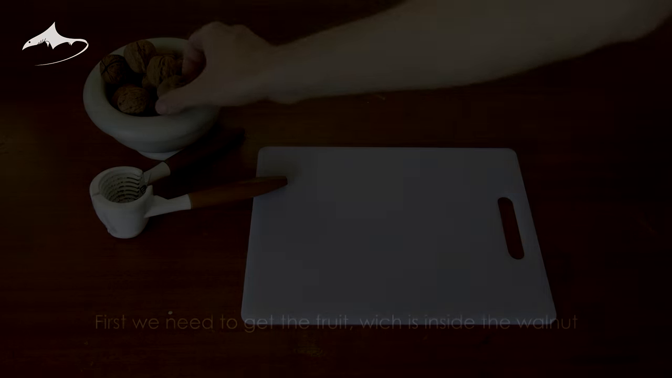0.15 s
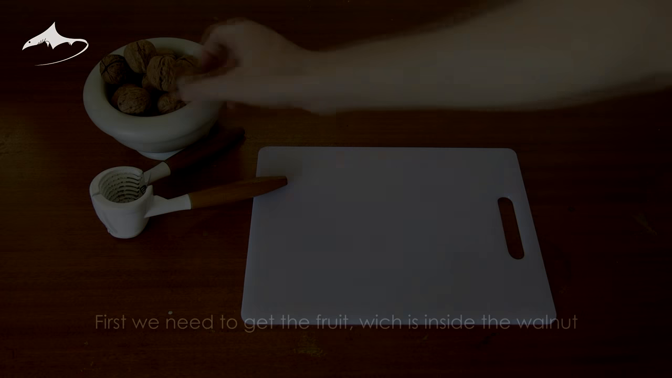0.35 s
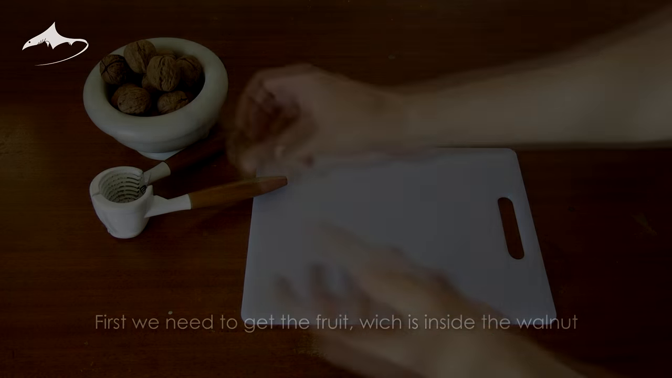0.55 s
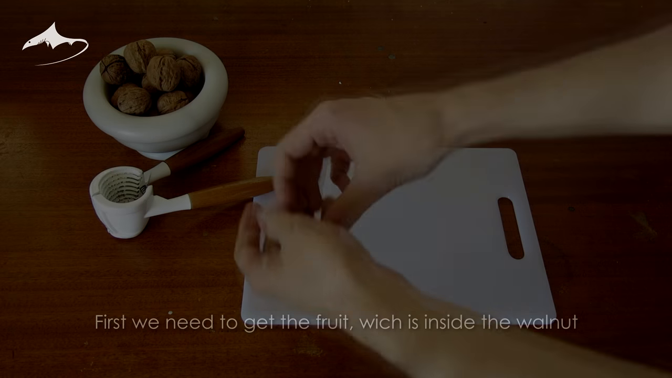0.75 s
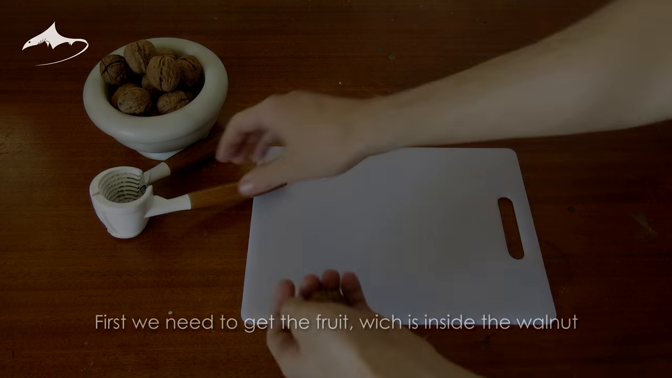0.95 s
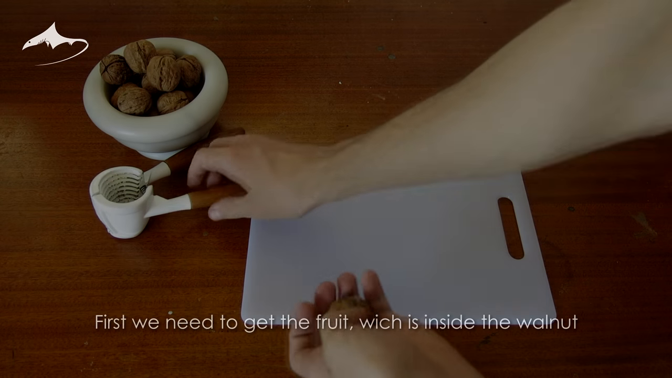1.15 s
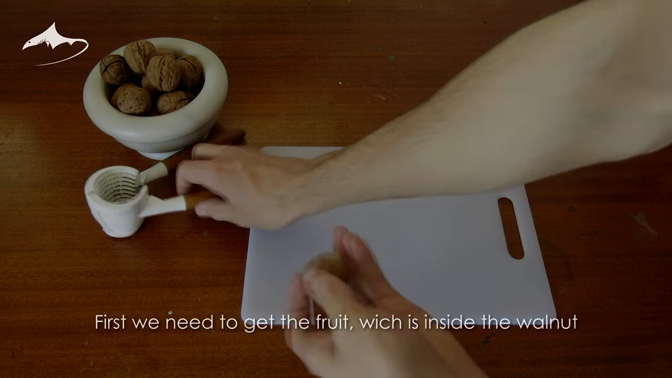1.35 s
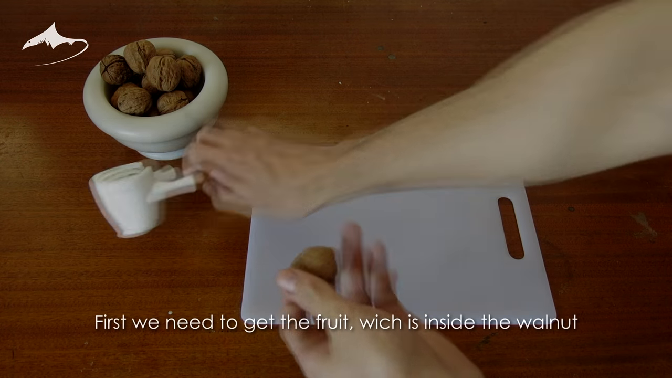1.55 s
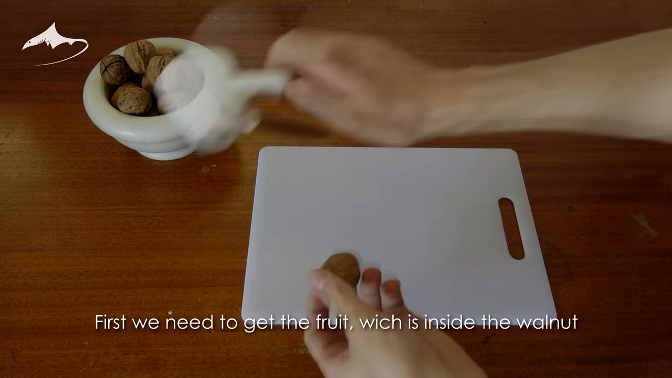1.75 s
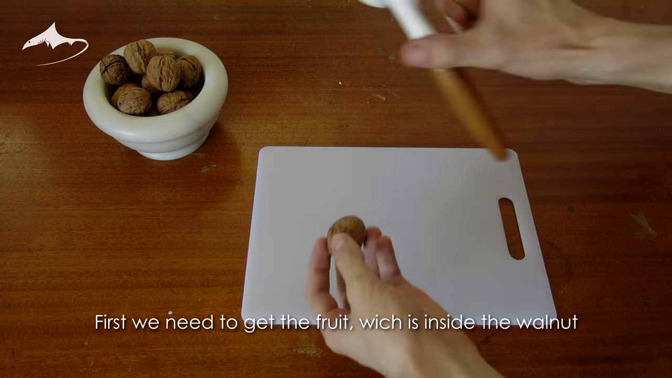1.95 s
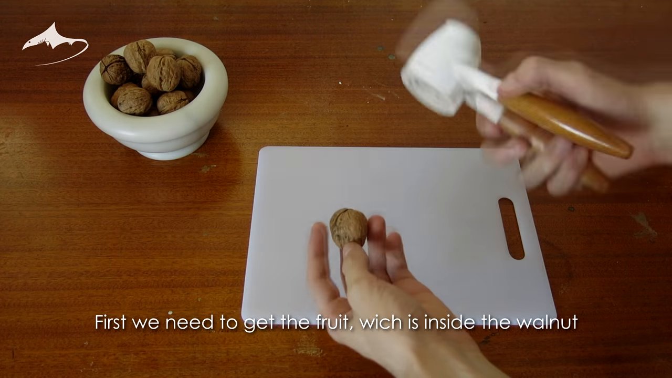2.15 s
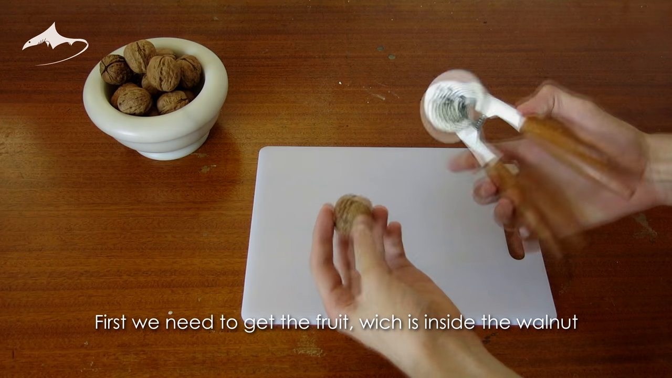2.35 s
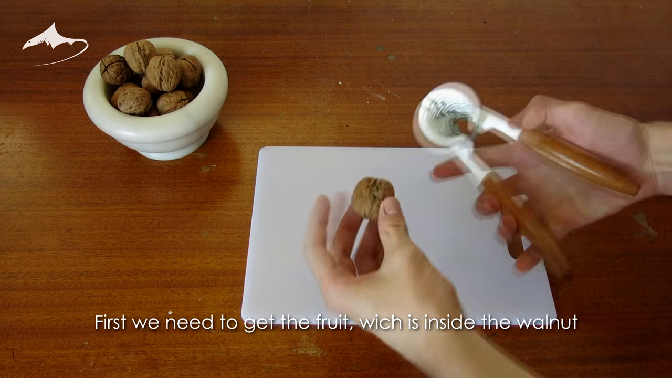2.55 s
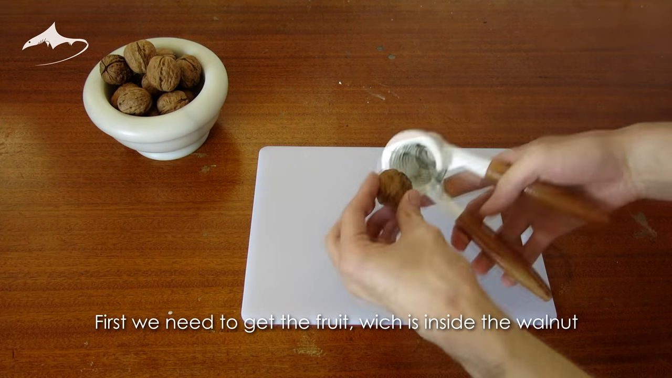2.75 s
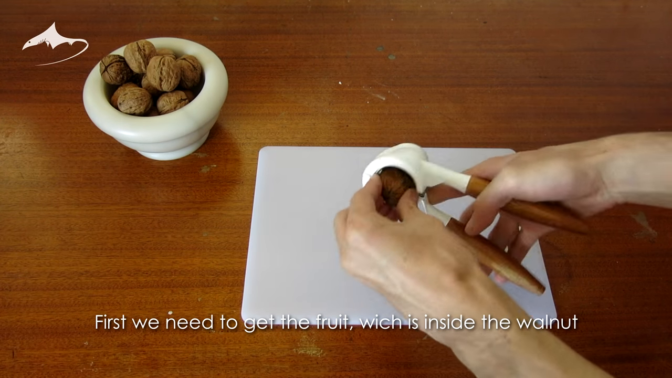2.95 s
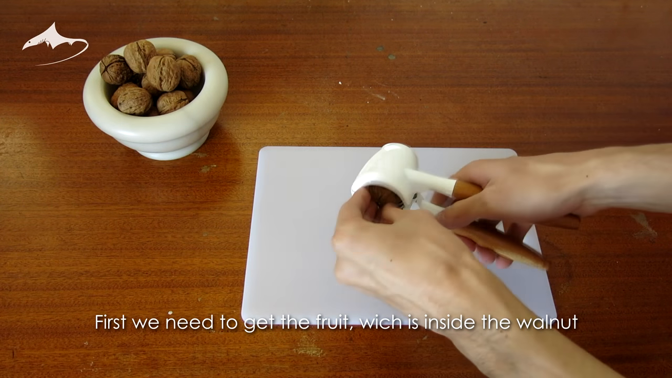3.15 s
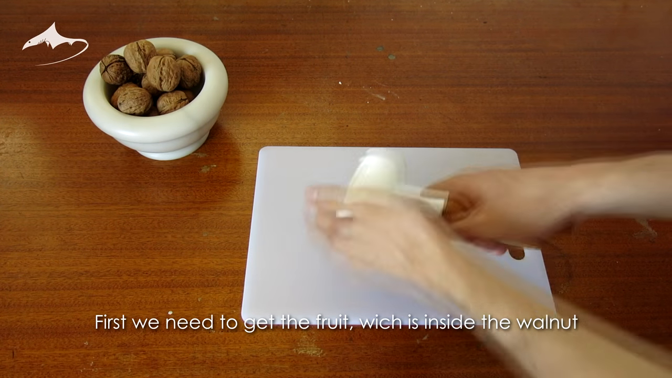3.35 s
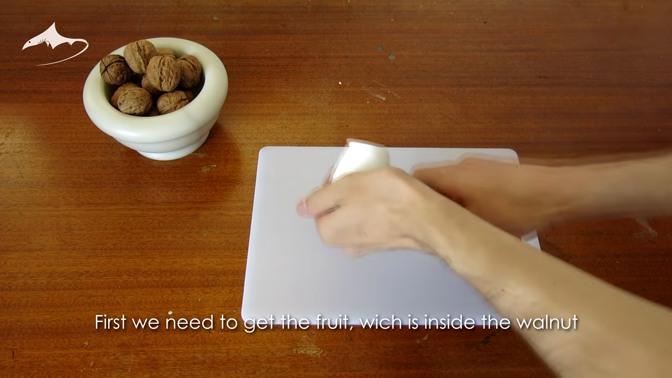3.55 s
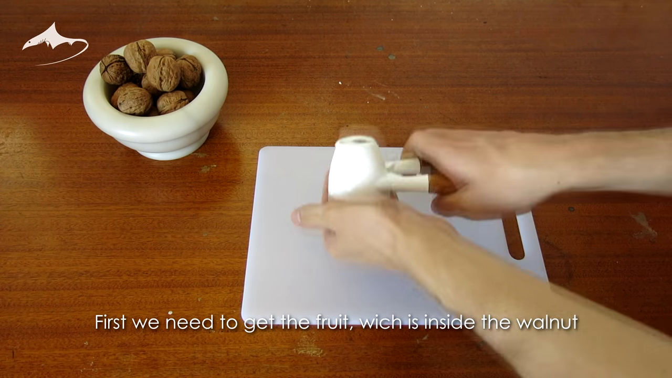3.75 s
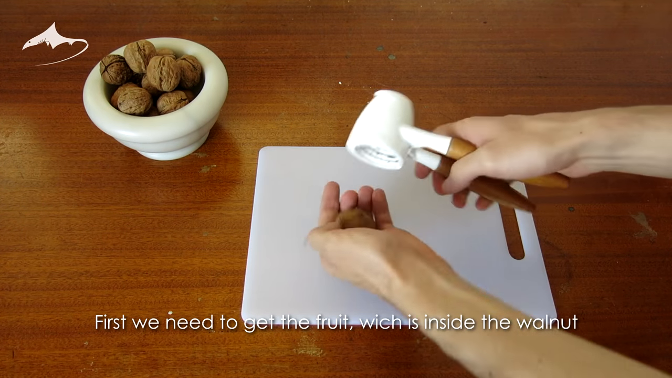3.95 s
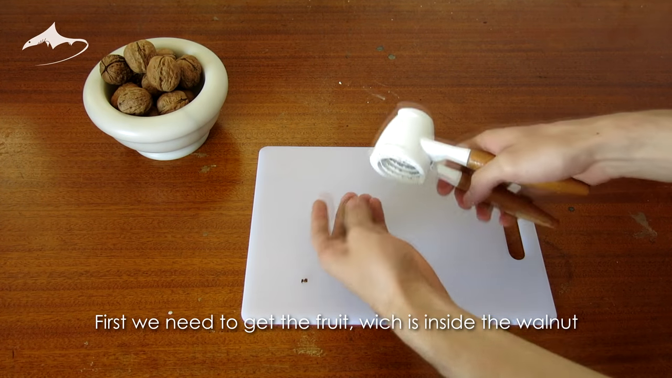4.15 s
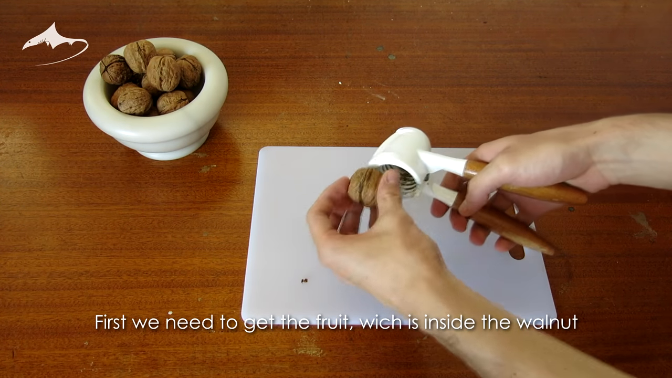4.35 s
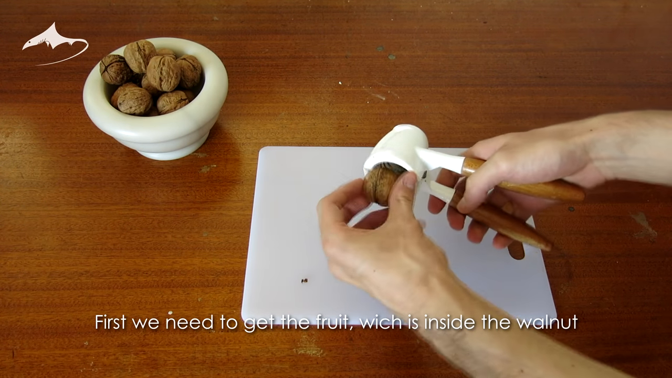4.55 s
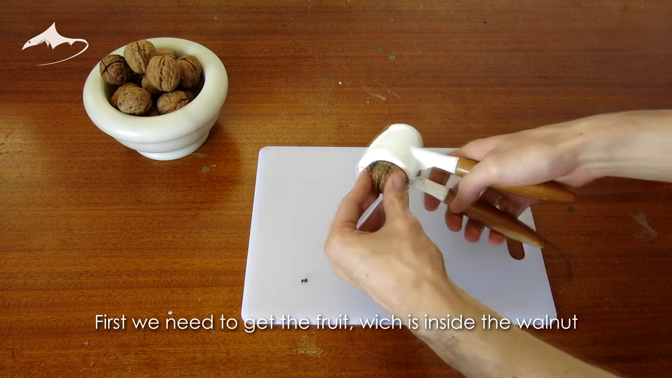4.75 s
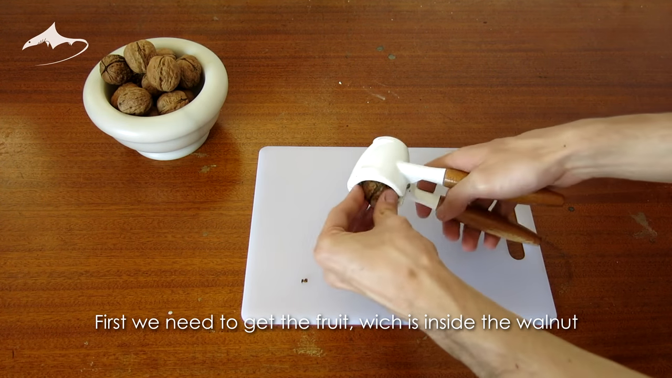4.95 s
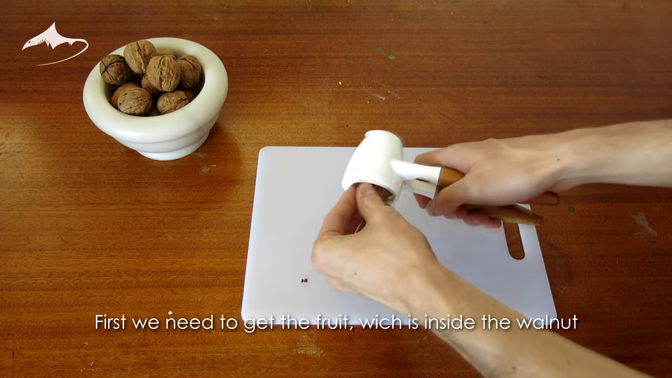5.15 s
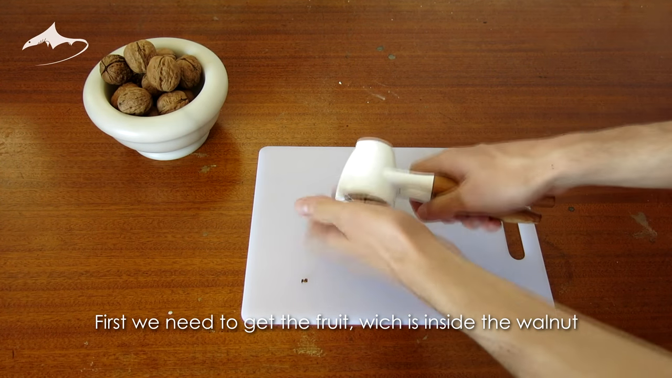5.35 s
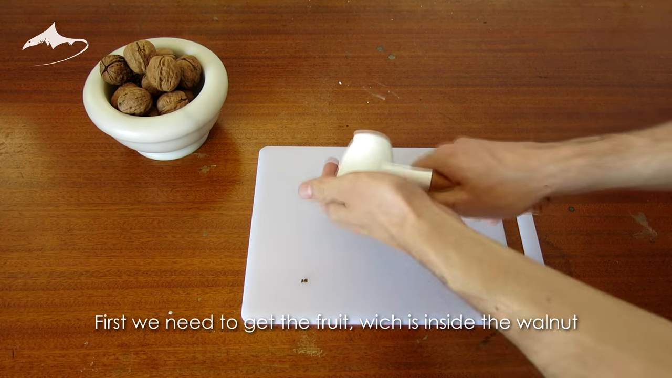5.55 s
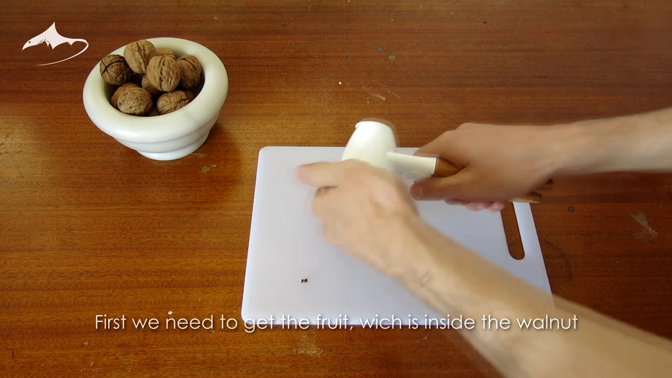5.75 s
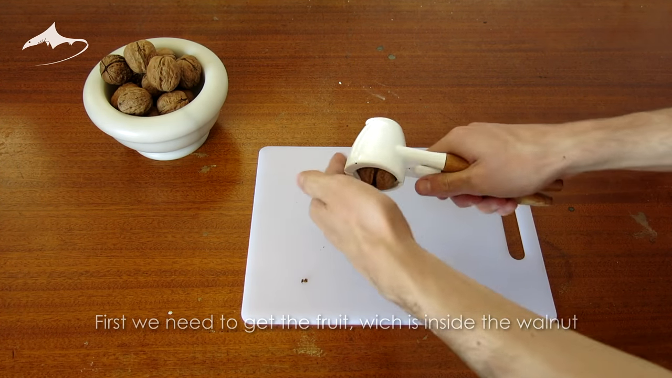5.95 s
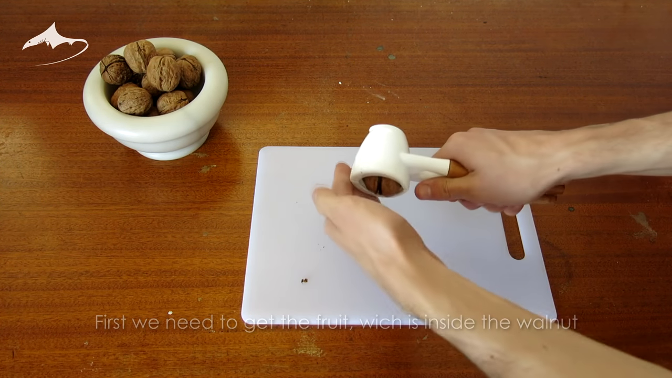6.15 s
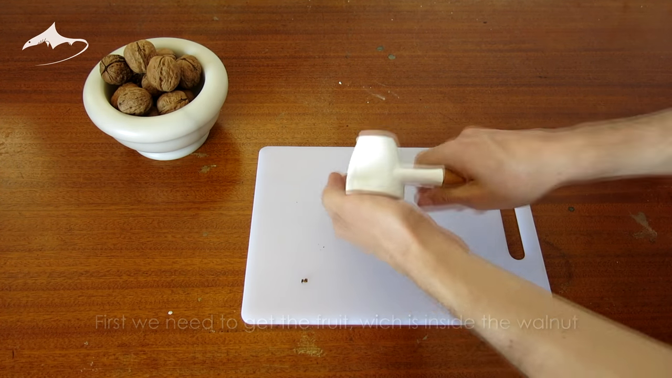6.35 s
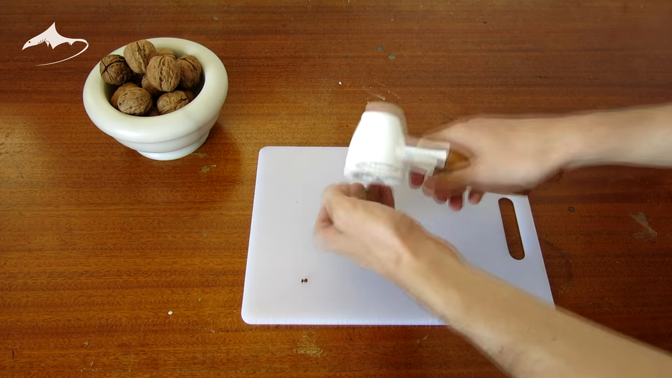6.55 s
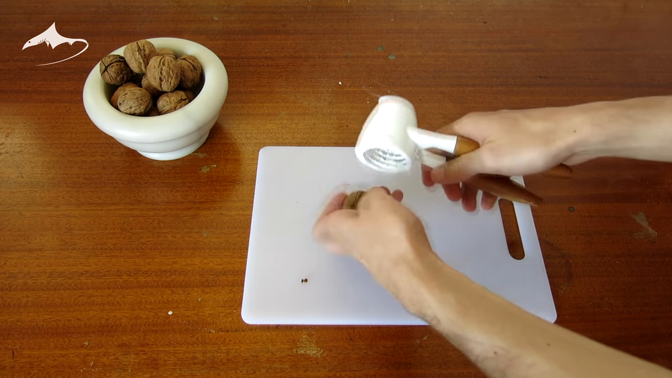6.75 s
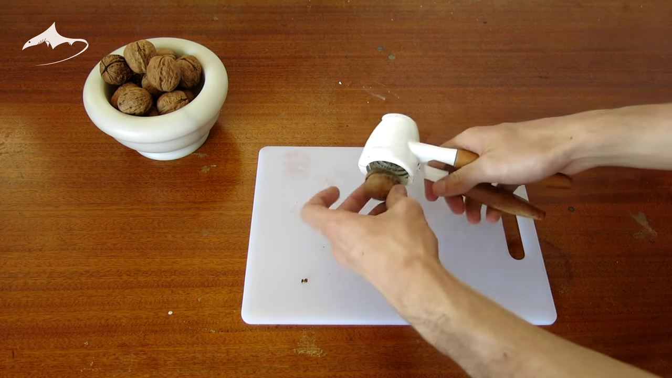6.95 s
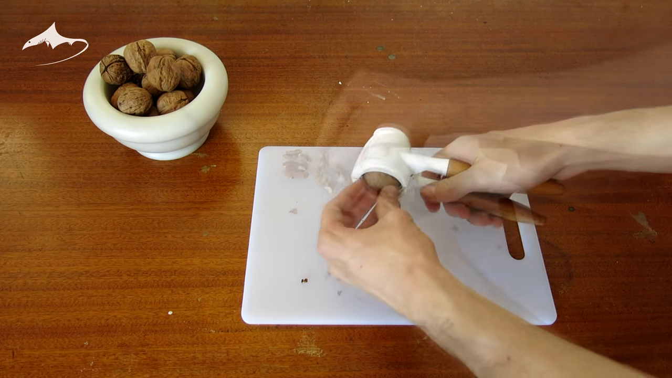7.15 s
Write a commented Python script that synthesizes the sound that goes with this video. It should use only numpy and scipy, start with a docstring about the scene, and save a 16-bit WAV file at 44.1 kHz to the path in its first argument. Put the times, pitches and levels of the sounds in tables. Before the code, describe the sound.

Quiet room noise, wooden thumps and metal clinks of a hand tool, dry walnut knocks and rubs, then loud crunching shell cracks, two clusters and a late snap.

```python
"""In a small room, at a wooden table with a cutting board, walnuts are cracked in a metal cup nutcracker.
The tool bumps and clinks as it is picked up: table and metal are sums of dying sine waves.
Nuts knock and rub in the cup, then break in short runs: noise bursts and clicks ring a hollow shell filter.
Steady room noise, hiss and rustle are shaped noise; each contact gets a board reflection and a room tail.
A gain control turns the sound down after the loudest cracks and lets the room noise creep back."""
import sys
import numpy as np
from scipy import signal
from scipy.fft import rfft, irfft
from scipy.io import wavfile
from scipy.ndimage import uniform_filter1d

SR = 44100
rng = np.random.default_rng(int(sys.argv[2]) if len(sys.argv) > 2 else 0)


def transcribe(signal):
    """Save signal, clipped to [-1, 1], as a 16-bit WAV file at the path in sys.argv[1]."""
    frames = np.atleast_2d(signal).T
    limited = np.clip(frames, -1, 1)
    pcm = np.round(limited * 32767).astype(np.int16)
    wavfile.write(sys.argv[1], SR, pcm)


N = 321930

# steady room noise: (frequency [Hz], relative level per Hz [dB])
AIR_COLOUR = [(25, -37.5), (50, -15.5), (80, -4), (108, 1), (190, -5.5), (255, -9), (305, -4), (355, -9.5),
              (480, -13), (750, -13.5), (1400, -18.5), (2600, -26), (5000, -33), (9000, -42.5),
              (16000, -50.5)]
# stereo width of that noise: (frequency [Hz], side minus mid [dB], left minus right [dB])
AIR_WIDTH = [(60, -4.5, 12), (107.7, -3, 12), (200, -6.5, -1.5), (380, -6, -5), (700, -0.5, -3.5),
             (2400, -1.5, -1)]
# the arms reach across: (middle [s], time from the middle to 1/e [s], high hiss [dB], low rustle [dB])
ARM_REACHES = [(0.73, 0.27, -60, -52.5), (3.098, 1, -62.5, -43.5)]
# colour of the low rustle: (frequency [Hz], relative level per Hz [dB])
RUSTLE_COLOUR = [(30, -30), (80, -6), (160, -1), (300, -6), (600, -12.5), (2000, -37.5), (16000, -74)]
# the cracker bumps the table: (time [s], level [dB], upper corner of the blow [Hz])
TABLE_BUMPS = [(1.406, -22.5, 1800), (1.4511, -21.5, 2010), (1.495, -24, 453), (1.5106, -25, 3020),
               (1.6604, -19, 950), (7.194, -29.5, 1350)]
# ringing modes of the table top: (frequency [Hz], strength [dB], time to fall 60 dB [s])
TABLE_MODES = [(187, -3, 0.02), (356.4, -0.5, 0.086), (423.4, 0, 0.21), (510, 0, 0.037), (648, -4.5, 0.088),
               (717, -2, 0.12), (956, -5.5, 0.15), (1180, 0, 0.015), (1410, -1.5, 0.042), (1605, 0, 0.039),
               (1850, -4, 0.08), (2370, -25, .03)]
# jaws and hinge clink: (time [s], level [dB], centre of the modes that the blow favours [Hz])
JAW_CLINKS = [(1.4085, -26, 4000), (1.4514, -29.5, 3740), (1.511, -17.5, 6900), (1.6611, -32, 5270),
              (2.0284, -20, 2630), (2.0307, -24, 8000), (2.1417, -30, 2370), (2.3884, -36, 2820),
              (2.7026, -33, 5040), (2.7805, -21.5, 2700)]
# modes of the cracker ringing freely: (frequency [Hz], strength [dB], time to fall 60 dB [s])
METAL_MODES = [(2200, 7.5, 0.038), (2417, 5, 0.1), (3010, 9.5, 0.044), (3160, 4.5, 0.021),
               (4110, 1.5, 0.19), (4018, 10.5, 0.053), (4654, 2.5, 0.089), (5300, -24, 0.022),
               (6290, 2.5, 0.022), (7190, 5, 0.033), (7510, 5, 0.074), (8520, -8, 0.049), (9080, -3, 0.046),
               (11300, -19, .02)]
# a nut rubs round in the cup: (start [s], end [s], level [dB], shell ring [Hz], scratch against ring [dB])
CUP_RUBS = [(2.799, 2.993, -40, 1180, 2), (3.722, 3.86, -58, 1830, 2.5), (4.731, 4.951, -49, 2130, -4),
            (4.962, 5.159, -51, 2060, 2.5), (5.594, 5.64, -34.5, 1446, 5.5),
            (6.921, 7.047, -44, 1584, -2.5), (7.183, 7.321, -49, 2030, 2.5)]
# clear knocks of a nut on the cup: (time [s], shell ring level [dB], ring [Hz], contact tick level [dB])
NUT_KNOCKS = [(2.8145, -28, 2220, -21.5), (2.874, -30, 1620, -33), (2.925, -25.5, 2210, -22),
              (2.951, -30, 2350, -27), (3.0558, -37, 2250, -33), (3.075, -39, 2800, -28),
              (3.801, -28.5, 1755, -37.5), (3.932, -25, 2130, -41.5), (4.3956, -27, 2330, -34.5),
              (4.3975, -28.5, 1650, -50), (4.6003, -36.5, 2480, -42.5), (4.7351, -20.5, 2280, -28),
              (4.8698, -25.5, 2200, -35.5), (5.0294, -31, 2290, -41), (5.0639, -38, 2400, -34.5),
              (5.086, -24.5, 2230, -30), (5.116, -29, 1800, -28), (5.9101, -31, 2275, -51.5),
              (6.4253, -27, 2470, -29.5), (6.926, -31, 1570, -33.5), (6.9615, -24.5, 1750, -30.5),
              (7.237, -25.5, 2420, -18)]
# colour of dry shell touching metal: (frequency [Hz], response [dB])
TICK_COLOUR = [(150, -15), (500, -9), (1400, 1.5), (2500, 5.5), (4000, -6.5), (6000, -7), (9000, -13),
               (13000, -19.5), (16000, -23)]
# loose shell ticks on the cup after a nut has broken: (start [s], end [s], tick level [dB])
CRUMB_SPANS = [(3.62, 4.101, -39.5), (5.78, 5.86, -36.5)]
# separately timed fractures, faint to loud; longer tears shed more splinters:
# (time [s], snap level [dB], shell ring level [dB], ring [Hz], tear, time to fall to 1/e [ms])
SHELL_CRACKS = [(3.3826, -15, -33, 3300, 2.4), (3.433, -25, -40, 4560, 7.9), (3.4594, -10.5, -7, 4770, 1.6),
                (3.4836, -3, -5.5, 2830, 3.4), (3.5074, -6, -9.5, 2100, 4.7),
                (5.4653, -33.5, -42, 2330, 1.7), (5.5282, -27.5, -49, 4500, 3.3),
                (5.5359, -8.5, -12, 2000, 1.6), (5.5993, -16, -19, 2270, 0.84),
                (5.6018, -11, -10, 2470, 2.3), (5.606, -9.5, -14.5, 2030, 3),
                (5.6459, -12.5, -17.5, 3780, 1.3), (5.6562, -11.5, -23, 4640, 3.7),
                (5.6883, -19.5, -42, 2330, 3.2), (6.146, -7.5, -28.5, 3080, 0.74),
                (6.1612, -12.5, -22.5, 1950, 0.85)]
# the jaws bear down between these fractures and the shell crackles: (start [s], end [s], snap level [dB])
JAW_SQUEEZES = [(3.473, 3.504, -22), (5.61, 5.63, -31)]
# bright colour of a fracture: (frequency [Hz], response [dB])
SNAP_COLOUR = [(200, -26), (700, -23.5), (1500, -16.5), (3000, -18), (4500, -2.5), (6000, 0.5), (7400, -3),
               (9000, 1.5), (12000, -2.5), (14500, -6), (16000, -11)]
# hollow shell modes: (multiple of ring pitch, undamped width as share of mode pitch, strength [dB])
SHELL_MODES = [(0.561, .14, -12), (0.742, 0.15, -5.5), (.88, .09, -0.5), (1, 0.094, 15), (1.13, .1, -21.5),
               (1.499, .2, -14.5)]
# how the room dies away: (frequency [Hz], time to fall 60 dB [s])
ROOM_DECAY = [(300, 0.42), (1300, 0.41), (3500, 0.35), (9000, 0.29), (16000, 0.18)]

HIT_SIZE, ROOM_SIZE = 8192, 16384  # lengths of one hit and of the room tail [samples]
AGE = np.arange(HIT_SIZE) / SR  # time since a hit [s]
TIME = np.arange(N) / SR  # time in the scene [s]
SIDES = np.array([[1], [-1]])  # signs of the left and right channels
TOP_HZ = 15800  # nothing much is left above this
LIFT_S = 1.6  # the cracker leaves the table [s]
LYING_RING, HELD_RING = 0.44, 0.4  # share of the free ring time, on the table and in the hand
REST_HISS_DB, REST_RUSTLE_DB = -66.5, -52.5  # what stays between the reaches


def undb(db):
    """Turn decibels into gain."""
    return 10 ** (np.asarray(db) / 20)


def level(x, db):
    """Set the average (rms) level of a sound."""
    return x * undb(db) / np.sqrt(np.mean(x ** 2))


def sized(x, db):
    """Give a hit the energy of four milliseconds at this rms level."""
    energy = np.sum(x ** 2) / len(x)
    return x * undb(db) / np.sqrt(energy / (.004 * SR))


def along(points, hz, axis=1):
    """Read a table column between its rows, on a log-frequency scale."""
    rows = np.array(points, float)
    return np.interp(np.log(hz + 1), np.log(rows[:, 0]), rows[:, axis])


def bins(size):
    """List the frequencies of a spectrum."""
    return np.arange(size // 2 + 1) * SR / size


def colour(x, points):
    """Filter with a (frequency [Hz], response [dB]) table, without ringing ahead of the sound."""
    size = x.shape[-1]
    # folding the cepstrum forward gives the filter minimum phase
    cepstrum = irfft(np.log(undb(along(points, bins(size)))), size)
    cepstrum[1:size // 2] *= 2
    cepstrum[size // 2 + 1:] = 0
    return irfft(rfft(x) * np.exp(rfft(cepstrum)), size)


def butter(x, order, hz, kind="low"):
    """Cut a sound with a smooth low, high or band filter."""
    return signal.sosfilt(signal.butter(order, hz, kind, fs=SR, output="sos"), x)


def pair(size, side_db):
    """Stereo noise: a shared middle plus a side part of opposite sign left and right."""
    return rng.standard_normal(size) + undb(side_db) * SIDES * rng.standard_normal(size)


def burst(ms, side_db=-9):
    """A dense run of tiny slips: noise that falls to 1/e in this many milliseconds."""
    return pair(HIT_SIZE, side_db) * np.exp(-AGE * 1000 / ms)


def slips(size, rate, grain_db):
    """Sparse tiny clicks (rate per second) of very uneven size, over a trace of smooth friction."""
    happens = rng.random(size) < rate / SR
    grains = undb(grain_db * np.minimum(rng.exponential(size=size), 3))
    return (happens * grains + 0.015) * pair(size, side_db=-9)


def scatter(start, end, spread_db, spread_octaves, count):
    """Small contacts spread unevenly over a span: (time [s], change of level [dB], pitch ratio)."""
    place, change, pitch = rng.uniform(-1, 1, (count, 3)).T
    times = start + (end - start) * (np.arange(count) + .5 + place / 2) / count
    return zip(np.minimum(times, TIME[-1]), spread_db * change, 2 ** (spread_octaves * pitch))


def add(out, s, x):
    """Mix a sound in at a time in seconds."""
    start = int(s * SR)
    out[:, start:start + x.shape[1]] += x[:, :N - start]


def ring(modes, weight, scatter_db=2, port_phase=0.38):
    """Dying sine modes; each blow varies their strength and pitch, and their phase between channels."""
    hz, db, t60 = np.array(modes, float).T[:, :, None]
    change, detune, phase, lag = rng.standard_normal((4, len(hz), 1))
    gain = weight(hz) * undb(db + scatter_db * change) / np.sqrt(t60)
    turn = 2 * np.pi * hz * (1 + 0.0086 * detune) * AGE + np.pi * phase
    onset = 1 - np.exp(-AGE * hz * 2)
    fade = gain * np.exp(-np.log(1000) * AGE / t60) * onset
    return np.array([np.sum(fade * np.sin(turn + side * port_phase * lag), axis=0) for side in (1, -1)])


def shell(push, hz, damping=1, low_share=0.42, high_share=0.98):
    """The short hollow ring of a walnut: a few broad resonances, with little sound outside their range."""
    size = push.shape[-1]
    f = bins(size) + 1
    response = 0
    for multiple, width, db in SHELL_MODES:
        mode_hz = hz * multiple
        response = response + undb(db) / (1 + 1j * (f / mode_hz - mode_hz / f) / (width * damping))
    return butter(irfft(rfft(push) * response, size), 2, [hz * low_share, hz * high_share], "band")


def room(x, board_ms=2.1, board_db=-12, wet_db=-4.5, build_s=0.0015):
    """A quick board reflection, then a small room's tail; the hands move, so no two tails are alike."""
    age = np.arange(ROOM_SIZE) / SR
    noise, f = rfft(pair(ROOM_SIZE, side_db=-8.0)), bins(ROOM_SIZE)
    decay = np.array(ROOM_DECAY)
    tail = 0
    # overlapping bands of noise, each with its own decay time
    for (hz, t60), own in zip(decay, np.eye(len(decay))):
        band = along(np.column_stack([decay[:, 0], own]), f)
        tail = tail + irfft(noise * band) * np.exp(-np.log(1000) * age / t60)
    tail = tail * (1 - np.exp(-age / build_s))
    response = undb(wet_db) * tail / np.sqrt(np.sum(tail ** 2) / 2)
    response[:, 0] += 1  # the direct sound
    response[:, int(board_ms * SR / 1000)] += undb(board_db)
    return signal.fftconvolve(x, response, axes=1)


def air(db=-40.5, waver_db=1.44):
    """Steady room noise, shaped by frequency and gently wavering, its rumble mostly on the left."""
    f = bins(N)
    mid, side = rfft(rng.standard_normal((2, N)))
    width = undb(along(AIR_WIDTH, f))
    balance = undb(SIDES * along(AIR_WIDTH, f, axis=2) / 2)
    spread = (mid + SIDES * width * side) * balance / balance.mean(axis=0)
    noise = irfft(spread * undb(along(AIR_COLOUR, f)), N)
    waver = level(uniform_filter1d(rng.standard_normal(N), SR // 6), 0)
    return level(noise, db) * undb(waver_db * waver)


def swells(low_hz=4500):
    """A faint, wide hiss and a low rustle, both noise, that come and go as the arms reach across."""
    hiss_gain, rustle_gain = undb(REST_HISS_DB), undb(REST_RUSTLE_DB)
    for s, half_s, hiss_db, rustle_db in ARM_REACHES:
        motion = np.exp(-((TIME - s) / half_s) ** 2)
        # separate noises add by energy
        hiss_gain = np.hypot(hiss_gain, motion * undb(hiss_db))
        rustle_gain = np.hypot(rustle_gain, motion * undb(rustle_db))
    hiss = butter(pair(N, side_db=1), 1, [low_hz, 14000], "band")
    rustle = colour(pair(N, side_db=-6.5), RUSTLE_COLOUR)
    return level(hiss, 0) * hiss_gain + level(rustle, 0) * rustle_gain


def rebounds(gap_s=.016, loss_db=-3.0, softening=.65, count=3):
    """Each bump rocks the cracker on the table, weaker and duller each time; rows as in TABLE_BUMPS."""
    return [(s + k * gap_s, db + k * loss_db, corner_hz * softening ** k)
            for s, db, corner_hz in TABLE_BUMPS for k in range(count)]


def thuds(contact_db=-4, low_hz=170):
    """The table top booms and the tool chatters on it; a softer blow weakens the upper modes."""
    out = np.zeros((2, N))
    for s, db, corner_hz in rebounds():
        modes = ring(TABLE_MODES, lambda hz: 1 / (1 + (hz / corner_hz) ** 2), port_phase=0.14)
        chatter = butter(burst(ms=11.4), 2, corner_hz)
        add(out, s, room(sized(modes, db) + sized(chatter, db + contact_db)))
    return butter(out, 2, low_hz, "high")


def clinks(octaves=0.68, contact_db=-4):
    """Metal meets metal and rattles; table contact shortens its ring, and the hand a little more."""
    out = np.zeros((2, N))
    for s, db, centre_hz in JAW_CLINKS:
        ring_share = LYING_RING if s < LIFT_S else HELD_RING
        damped = np.array(METAL_MODES) * [1, 1, ring_share]
        modes = ring(damped, lambda hz: 1 / (1 + (np.log2(hz / centre_hz) / octaves) ** 2), port_phase=0.26)
        rattle = butter(colour(burst(ms=3.5, side_db=-1.5), TICK_COLOUR), 2, centre_hz * 0.59, "high")
        add(out, s, room(sized(modes, db) + sized(rattle, db + contact_db), wet_db=-5.5))
    return out


def rubs(pitch_spread=0.2):
    """Ridges of the shell catch and slip on the cup; three points of contact ring at their own pitch."""
    out = np.zeros((2, N))
    for start, end, db, ring_hz, scratch_db in CUP_RUBS:
        size = 2 * int(max(end - start, .02) * SR / 2)
        swell = signal.windows.tukey(size, .5)  # fades in and out
        ridges = {k: slips(size, rate=170, grain_db=3) * swell for k in (-1, 0, 1)}
        body = sum(shell(push, ring_hz * (1 + k * pitch_spread), damping=4.2) for k, push in ridges.items())
        scratch = colour(sum(ridges.values()), TICK_COLOUR)
        add(out, start, room(level(level(body, 0) + level(scratch, scratch_db), db)))
    return out


def jostles(over_rub_db=9):
    """Light knocks as a rubbed nut tips from ridge to ridge; rows as in NUT_KNOCKS."""
    rows = []
    for start, end, db, hz, scratch_db in CUP_RUBS:
        for s, change_db, ratio in scatter(start, end, spread_db=0.5, spread_octaves=0.18, count=4):
            ring_db = db + over_rub_db + change_db
            rows.append((s, ring_db, hz * ratio, ring_db + scratch_db))
    return rows


def crumbs(ring_db=-9, ring_hz=2300, count=2):
    """Bits of broken shell are too small to ring much; rows as in NUT_KNOCKS."""
    return [(s, db + change_db + ring_db, ring_hz * ratio, db + change_db)
            for start, end, db in CRUMB_SPANS
            for s, change_db, ratio in scatter(start, end, spread_db=3, spread_octaves=.15, count=count)]


def knocks():
    """Whole nuts and loose bits hit the cup: a dry tick of noise and a hollow shell ring."""
    out = np.zeros((2, N))
    for s, ring_db, hz, tick_db in NUT_KNOCKS + jostles() + crumbs():
        tick = colour(burst(ms=2.2), TICK_COLOUR)
        body = shell(burst(ms=0.93, side_db=-15.5), hz, damping=0.72, low_share=0.72, high_share=1.38)
        add(out, s, room(sized(tick, tick_db) + sized(body, ring_db), wet_db=-5.5))
    return out


def hairlines(ring_db=-5, ring_hz=3300, tear_ms=4.0):
    """Small fractures that run through a squeezed shell; rows as in SHELL_CRACKS."""
    return [(s, db + change_db, db + change_db + ring_db, ring_hz * ratio, tear_ms)
            for start, end, db in JAW_SQUEEZES
            for s, change_db, ratio in scatter(start, end, spread_db=2, spread_octaves=.6, count=5)]


def cracks(splinter_db_per_ms=-17, splinter_s=0.018):
    """Each fracture snaps brightly and rings the split, damped shell; a longer tear sheds more splinters."""
    out = np.zeros((2, N))
    for s, snap_db, ring_db, hz, tear_ms in SHELL_CRACKS + hairlines():
        clicks = slips(HIT_SIZE, rate=660, grain_db=2) * np.exp(-AGE / splinter_s)
        # the level is that of a 1 ms tear; the gain grows with the tear
        splinters = tear_ms * sized(clicks, splinter_db_per_ms)
        snap = colour(sized(burst(tear_ms, side_db=-1.0), 0) + splinters, SNAP_COLOUR)
        push = sized(burst(tear_ms, side_db=-14.5), 0) + splinters
        body = shell(push, hz, damping=1.5, high_share=1.7)
        add(out, s, room(sized(snap, snap_db) + sized(body, ring_db), wet_db=-8.5))
    return out


def scene():
    """Room noise and arm movement lie under the bumps, clinks, rubs, knocks and cracks."""
    work = thuds() + clinks() + rubs() + knocks() + cracks()
    return air() + swells() + work


def smooth(x, seconds):
    """Follow a signal with a simple lag."""
    keep = np.exp(-1 / (seconds * SR))
    return signal.lfilter([1 - keep], [1, -keep], x)


def record(dry, threshold_db=-20, recovery_db_per_s=3.5, sense_s=0.033, attack_s=0.0079):
    """Gain ducks just after a loud crack and recovers slowly; peaks past full scale clip; the top is cut."""
    power = smooth(np.mean(dry ** 2, axis=0), sense_s)
    over_db = np.maximum(10 * np.log10(power + 1e-12) - threshold_db, 0)
    # a running maximum against a rising line makes the duck fall back at a steady rate
    recovered_db = recovery_db_per_s * TIME
    duck_db = np.maximum.accumulate(over_db + recovered_db) - recovered_db
    clipped = np.clip(dry * undb(-smooth(duck_db, attack_s)), -1, 1)
    return signal.sosfilt(signal.ellip(8, .2, 70, TOP_HZ, fs=SR, output="sos"), clipped)


dry = scene()
out = record(dry)
transcribe(out)
```